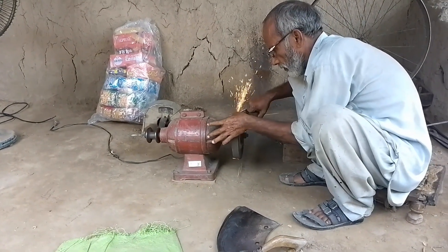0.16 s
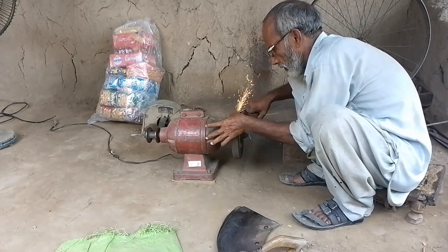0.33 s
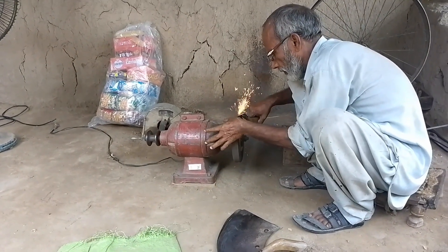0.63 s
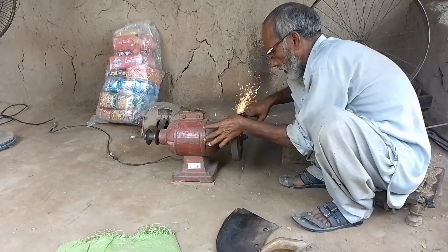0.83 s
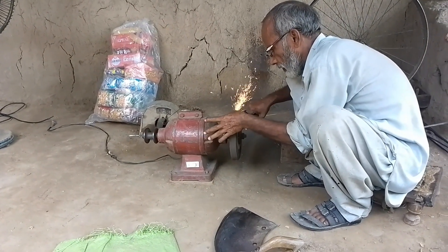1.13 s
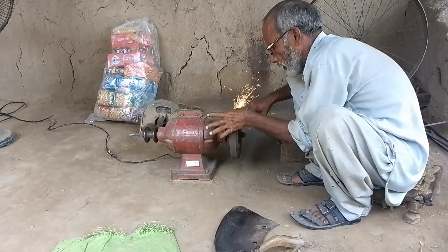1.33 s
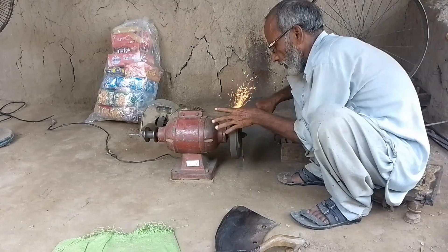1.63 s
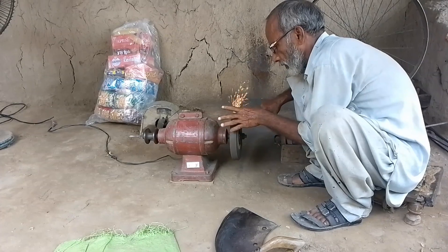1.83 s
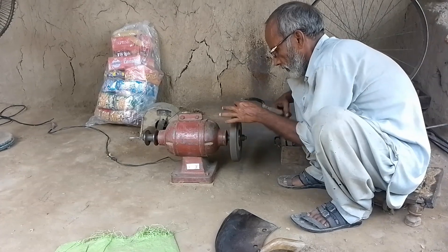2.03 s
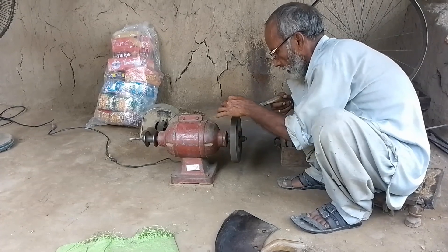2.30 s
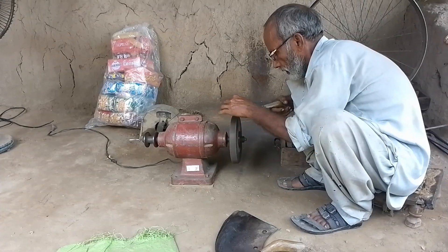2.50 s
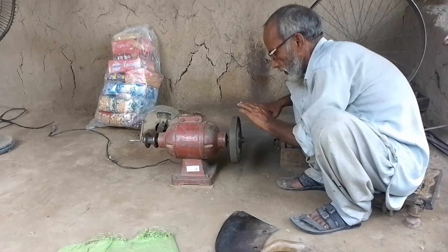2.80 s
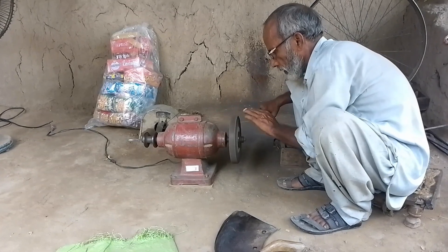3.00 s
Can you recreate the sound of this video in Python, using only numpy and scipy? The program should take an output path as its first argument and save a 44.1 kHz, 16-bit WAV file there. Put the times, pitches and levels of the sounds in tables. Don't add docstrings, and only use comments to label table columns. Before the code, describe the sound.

A bench grinder wheel rasps loudly on a steel blade, close to the microphone, its grit pulsing rapidly and tone shifting with each grip; brief squeals, then light pings and soft motor hum in an open yard.

```python
import sys
import numpy as np
from scipy import signal
from scipy.fft import rfft, irfft, next_fast_len
from scipy.io import wavfile
from scipy.ndimage import uniform_filter1d, map_coordinates

SR = 44100
rng = np.random.default_rng(int(sys.argv[2]) if len(sys.argv) > 2 else 0)


def output_pcm(signal):
    pcm = np.clip(np.atleast_2d(signal).T, -1, 1) * 32767
    wavfile.write(sys.argv[1], SR, np.round(pcm).astype(np.int16))


def magnitude_from_level(level_db):
    exponent = np.asarray(level_db, float) / 20
    return 10 ** exponent


N = 138915


def unit(x):
    return x / np.sqrt(np.mean(x ** 2) + 1e-20)


def along(points, hz):
    f, v = np.transpose(points)
    return np.interp(np.log(hz + 1), np.log(f + 1), v)


def curves(rows):
    s, *cols = np.transpose(rows)
    return [np.interp(np.arange(N) / SR, s, c) for c in cols]


def wobble(rate):
    return map_coordinates(rng.standard_normal(4000), [np.arange(N) * rate / SR])


def filtered(x, response):
    m = next_fast_len(N + SR // 2)
    return irfft(rfft(x, m) * response(np.fft.rfftfreq(m, 1 / SR)), m)[..., :N]


def patchy(x, depth_db):
    z = signal.stft(x, nperseg=512)[2]
    field = uniform_filter1d(rng.standard_normal(z.shape), size=5, axis=0)
    field = uniform_filter1d(field, size=16, axis=1)
    return signal.istft(z * magnitude_from_level(depth_db * unit(field)), nperseg=512)[1][:N]


def grit():
    # (time [s], speed [turns/s])
    wheel_speed = [(0, 48.55), (.45, 48.5), (.7, 48.2), (1, 48.1), (1.5, 48.1), (1.9, 48.2), (2.3, 49),
                   (3.15, 49)]
    # (time [s], slide across the wheel [tracks/s], share of fresh chipping [0-1])
    blade_slide = [(0, 9, .3), (.2, 7, .15), (.5, 7, .2), (.65, 20, .3), (.85, 9, .25), (1, 6, .12),
                   (1.25, 9, .2), (1.45, 6, .1), (1.6, 18, .4), (1.75, 25, .65), (1.9, 30, .9)]
    shake_s, chatter_db, lump_db = .00001, .6, 1.2
    grit_spike = 1.25
    spot_db, spot_turn, spot_sharp = 2.8, .745, 3.5

    speed, = curves(wheel_speed)
    slide, fresh = curves(blade_slide)
    turn = np.cumsum(speed) / SR + 48 * shake_s * wobble(40)
    track = np.cumsum(slide) / SR

    grains = rng.standard_normal((64, 916))
    rough = signal.resample(np.sign(grains) * np.abs(grains) ** grit_spike, 3664, axis=1)
    lumps = unit(uniform_filter1d(rng.standard_normal((64, 3664)), size=250, axis=1, mode="wrap"))

    def read(face, rows):
        return unit(map_coordinates(face, [rows % 63, turn % 1 * 3663], order=3))

    surface = np.sqrt(1 - fresh) * read(rough, track) + np.sqrt(fresh) * rng.standard_normal(N)
    spot_angle = 2 * np.pi * (turn - spot_turn) + .3 * wobble(4)
    spot = np.exp(spot_sharp * (np.cos(spot_angle) - 1)) * (1 + .15 * wobble(7))
    bite_db = spot_db * spot + lump_db * read(lumps, track / 2) + chatter_db * fresh * wobble(60)
    return surface, magnitude_from_level(bite_db)


def blade(scrape):
    # (time [s], level [dB])
    press = [(0, -16.5), (.1, -16), (.2, -16), (.45, -15.5), (.58, -17.5), (.65, -16.5), (.73, -18),
             (.95, -15), (1.02, -15), (1.3, -14), (1.5, -13), (1.6, -16.5), (1.78, -14.5), (1.88, -18),
             (1.95, -20), (1.997, -22), (2.025, -44.5)]
    grip_s = [.1, .36, 0.971, 1.14, 1.33, 1.598, 1.83]
    regrip_s = [.06, 0.31, .12, 0.24, 0.12, 0.13, .1]
    # (frequency [Hz], density [dB per Hz])
    tone_start = [(1780, -46), (2250, -6), (3380, -22.5), (4300, -13), (6500, -5), (9000, -7), (12300, -7),
                  (15700, -7)]
    tone_a = [(1700, -30), (2250, -10), (3400, -23), (4500, -5), (5650, -7), (7000, -2.5), (11500, -7),
              (15700, -14.5)]
    tone_b = [(1750, -17.5), (2490, -3), (3200, -21.5), (4470, -2.5), (5050, -7), (7000, -11.5),
              (12800, -15), (15700, -15.5)]
    tone_c = [(1750, -26.5), (2000, -9.5), (2500, -1.5), (3400, -13.5), (5150, -16), (6600, -6.5),
              (7600, -13.5), (12800, -10.5), (15700, -13)]
    tone_c2 = [(1720, -26), (2050, -5.5), (3500, -22.5), (5600, -10), (6600, -2.5), (11700, -7.5),
               (14200, -8), (15700, -17.5)]
    tone_d = [(1720, -28), (2050, -5), (3260, -14), (4510, -0.5), (5440, -7), (7400, -2), (8800, -8),
              (10200, -3), (14600, -4), (15700, -5)]
    tone_e = [(1780, -29), (2050, -11), (3260, -10), (3780, -3), (5390, -6), (12400, -1), (14300, -2),
              (15700, -12.5)]
    tone_f = [(1780, -35.5), (2000, -12.5), (2600, -12), (3600, -3), (5800, -7), (8300, -1.5), (12000, 0),
              (15700, -7)]
    # (frequency [Hz], width [Hz], level [dB])
    ring_start = [(2260, 67, -3.5), (2970, 66, -4), (3880, 100, -1), (4920, 250, -3.5), (5850, 100, 0),
                  (6800, 230, -3.5), (8650, 120, -11.5), (10200, 300, -4.5), (15200, 600, -1)]
    ring_a = [(2390, 100, -5), (3060, 66, -4), (3900, 360, -3), (5840, 100, -2.5), (6734, 60, -1.5),
              (7400, 150, -6.5), (8080, 130, -0.5), (10130, 100, 1), (14000, 300, 3.5), (14900, 180, 1.5)]
    ring_b = [(2650, 27, -5.5), (2930, 18, -2), (3755, 150, -3.5), (4410, 210, -5), (5387, 18, -5.5),
              (7670, 53, -13), (8360, 100, -7.5), (10020, 100, -4.5), (10500, 148, -6.5), (11200, 75, -6),
              (14300, 500, -12)]
    ring_c = [(3010, 130, -3.5), (3800, 150, 2.5), (4500, 200, 3.5), (6400, 410, -3), (8560, 130, -4.5),
              (10220, 100, 0), (10500, 36, -5), (13660, 150, -10), (14650, 200, -2.5)]
    ring_c2 = [(2530, 94, -4), (2960, 80, -3.5), (3850, 200, -3), (4660, 150, 0), (5270, 40, -2.5),
               (6150, 370, 2.5), (7200, 200, -4.5), (8840, 94, 6), (9240, 80, -6.5), (11300, 60, -11),
               (14000, 150, -6), (14700, 200, -2.5)]
    ring_d = [(2900, 25, -6.5), (4496, 120, -1), (6090, 17, -5), (6950, 81, -3), (9700, 76, -0.5),
              (11300, 26, -1.5), (14600, 36, -1.5)]
    ring_e = [(3700, 250, -3.5), (4450, 150, 1.5), (9080, 66, 1.5), (10600, 250, -3), (13800, 133, 0.5),
              (14800, 300, 3)]
    ring_f = [(1990, 54, -15), (3700, 250, -8), (4450, 150, -2.5), (4950, 150, 0.5), (5750, 120, -8.5),
              (7000, 150, -4), (7800, 150, -8), (10360, 390, 2), (14500, 370, 1.5)]
    ring_gain = [1, 1, 1, 0, 0, 3, 1, 1]
    widen_hz = 200
    patch_db, skid_patch_db = 1.1, .6

    t = np.arange(N) / SR
    changes = [np.clip((t - s) / long_s + .5, 0, 1) for s, long_s in zip(grip_s, regrip_s)]
    steps = [1] + changes + [0]
    tones = [tone_start, tone_a, tone_b, tone_c, tone_c2, tone_d, tone_e, tone_f]
    rings = [ring_start, ring_a, ring_b, ring_c, ring_c2, ring_d, ring_e, ring_f]
    out = 0
    for k, (tone, ring, ring_db) in enumerate(zip(tones, rings, ring_gain)):
        def colour(f):
            power = magnitude_from_level(2 * along(tone, f))
            for hz, width, db in ring:
                power = power + magnitude_from_level(2 * (db + ring_db)) / (1 + (2 * (f - hz) / (width + widen_hz)) ** 2) ** 2
            return np.sqrt(power) * np.clip(f / 1700, 0, 1) ** 10

        out = out + (steps[k] - steps[k + 1]) * unit(filtered(scrape, colour))

    skid = steps[-3]
    steady = np.sqrt(1 - skid) * patchy(out, patch_db)
    skidding = np.sqrt(skid) * patchy(out, patch_db + skid_patch_db)
    return unit(steady + skidding) * magnitude_from_level(curves(press + [(2.08, -100)])[0])


def squeals(bite):
    # (start [s], length [s], frequency [Hz], level [dB rms])
    singing = [(.1, .24, 3104, -29), (.72, .42, 2503, -27), (.62, .38, 1062, -46), (.62, .3, 1400, -50),
               (1.22, .24, 1300, -55), (1.37, .2, 5965, -26), (1.37, .13, 7122, -28),
               (1.44, .12, 7218, -28), (1.26, .09, 9870, -30), (1.42, .1, 9870, -32),
               (1.36, .22, 4475, -35), (1.4, .16, 4620, -34), (1.4, .14, 11260, -33), (.12, .2, 8340, -30)]
    edge_s = .06
    t, out = np.arange(N) / SR, 0
    for s, long_s, hz, db in singing:
        level = magnitude_from_level(db + 3 + 1.4 * wobble(8.2))
        gate = np.clip(np.minimum(t - s, s + long_s - t) / edge_s + .5, 0, 1) ** 2
        out = out + level * gate * bite * np.sin(2 * np.pi * hz * t + 0.23 * wobble(24.88))
    return out


def glances():
    # (time [s], length [s], frequency [Hz], level [dB rms])
    pings = [(1.906, 0.022, 2037, -31), (1.955, 0.018, 4450, -28.5), (1.963, .016, 3800, -23.5),
             (1.964, 0.016, 7800, -33), (1.978, .016, 3700, -27.5), (1.984, .016, 7000, -28.5),
             (1.989, 0.015, 5750, -30), (1.992, 0.011, 2260, -39), (2.034, 0.015, 2305, -47)]
    t, out = np.arange(N) / SR, 0
    for s, long_s, hz, db in pings:
        swell = np.exp(-(2 * (t - s) / long_s) ** 2)
        out = out + np.sqrt(2) * magnitude_from_level(db) * swell * np.sin(2 * np.pi * hz * t)
    return out


def frame(scrape):
    # (frequency [Hz], density [dB per Hz])
    body_colour = [(88, -29.5), (247, 2), (416, -5.5), (670, 2), (800, -11.5), (1060, 0), (1220, -9.5),
                   (1420, -2.5), (1700, -22), (2000, -81)]
    # (time [s], level [dB])
    load = [(0, -35), (.15, -39.5), (.4, -36), (.9, -36), (1.1, -43.5), (1.5, -48.5), (1.9, -54),
            (2.03, -58)]
    loose = .4
    ease_s, drum_hz, drum_width_hz, drum_db = 1, 539, 120, 4.5

    shake = np.sqrt(1 - loose) * unit(scrape) + np.sqrt(loose) * rng.standard_normal(N)
    body = filtered(shake, lambda f: magnitude_from_level(along(body_colour, f)) * (f > 70))
    drum = filtered(body, lambda f: magnitude_from_level(drum_db) / (1 + (2 * (f - drum_hz) / drum_width_hz) ** 2))
    eased = np.clip((np.arange(N) / SR - ease_s) / 0.4 + .5, 0, 1)
    return unit(patchy(body + eased * drum, depth_db=-0.5)) * magnitude_from_level(curves(load + [(2.3, -67)])[0])


def ground(rasp):
    # (frequency [Hz], width [Hz], depth [0-1])
    shadow = [(1722, 120, 0.9), (12050, 200, 0.3)]

    def notches(f):
        dips = [1 - np.clip(depth, 0, 1) / (1 + (2 * (f - hz) / width) ** 2) for hz, width, depth in shadow]
        return np.prod(dips, axis=0)

    return filtered(rasp, notches)


def wall(x):
    # (frequency [Hz], time to fall 60 dB [s])
    decay = [(500, 0.097), (2400, 0.36), (4000, 0.34), (6000, 0.14), (8000, .2), (13000, 0.13)]
    t, out = np.arange(N) / SR, 0
    for s in np.arange(0, 2.4, .2):
        hz, lag, z = signal.stft(rng.standard_normal(SR // 2), SR, nperseg=256)
        fall = magnitude_from_level(-60 * lag / along(decay, hz)[:, None])
        tail = signal.istft(z * fall, SR, nperseg=256)[1]
        share = np.cos(np.pi / 2 * np.clip((t - s) / .2, -1, 1))
        out = out + signal.oaconvolve(x * share, tail[:SR // 3] / np.linalg.norm(tail))[:N]
    return out


def motor():
    # (frequency [Hz], level [dB rms])
    hum = [(48.4, -66.5), (150.7, -50), (209.9, -52), (263.8, -59.5), (376.8, -64.5), (613.7, -64)]
    waver_db = 2
    t, out = np.arange(N) / SR, 0
    for hz, db in hum:
        level = np.sqrt(2) * magnitude_from_level(db + waver_db * wobble(14))
        out = out + level * np.sin(2 * np.pi * hz * t + .5 * wobble(11))
    return out


def yard():
    # (frequency [Hz], density [dB per Hz])
    rumble = [(15, -60.5), (25, -28.5), (113, -12.5), (146, -3), (176, -5.5), (261, -6.5), (295, -19.5),
              (381, -15.5), (1500, -23), (1950, -66.5), (3300, -120)]
    hiss = [(880, -29.5), (1500, -9), (1760, -1.5), (1900, -2), (3200, -5), (4170, 0), (5710, -16.5),
            (10500, -18), (15700, -27.5)]
    far_rumble = [(150, -32), (200, -2), (300, 0), (420, -17), (900, -50)]
    # (multiple, level [dB])
    far_lines = [(1, -44), (2, -51.5), (3, -52)]
    low_db, high_db, far_rumble_db = -43.5, -53.5, -45
    far_s, far_rise_s, far_hz = 3.06, 0.089, 265

    def noise(colour):
        return unit(filtered(rng.standard_normal(N), lambda f: magnitude_from_level(along(colour, f))))

    t = np.arange(N) / SR
    low = magnitude_from_level(low_db - 3 + .8 * wobble(40)) * patchy(noise(rumble), depth_db=1)
    high = magnitude_from_level(high_db) * noise(hiss)
    far = magnitude_from_level(far_rumble_db) * noise(far_rumble)
    for k, db in far_lines:
        far = far + magnitude_from_level(db + 2.1 * wobble(20)) * np.sin(2 * np.pi * k * far_hz * t + k * .6 * wobble(7.3))
    return low + high + far / (1 + np.exp(-4 * (t - far_s) / far_rise_s))


def scene():
    surface, bite = grit()
    rasp = blade(surface * bite) + frame(surface * np.sqrt(bite)) + squeals(unit(bite))
    rasp = ground(rasp)
    wall_db = -6
    return (rasp + magnitude_from_level(wall_db) * wall(rasp) + glances() + motor() + yard())[None]


def low_pass(x):
    return signal.sosfilt(signal.butter(12, 17070, fs=SR, output="sos"), x)


def record(dry):
    ceiling, top_hz = .92, 15740
    soft = dry / (1 + np.abs(dry / ceiling) ** 10) ** (1 / 10)
    band = filtered(soft, lambda hz: np.clip((top_hz - hz) / 40, 0, 1))
    return low_pass(band)


dry = scene()
out = record(dry)
output_pcm(out)
```